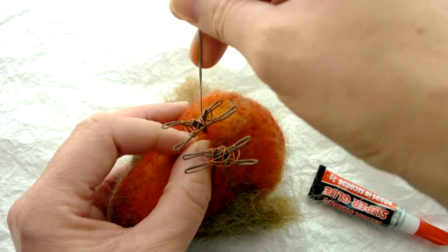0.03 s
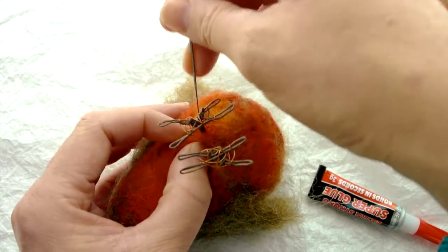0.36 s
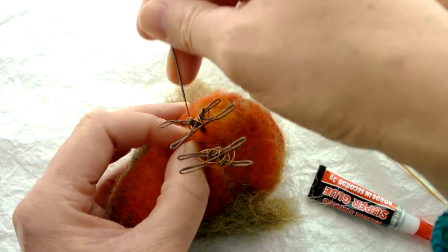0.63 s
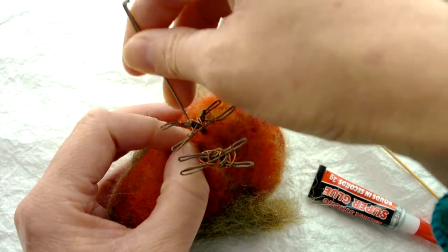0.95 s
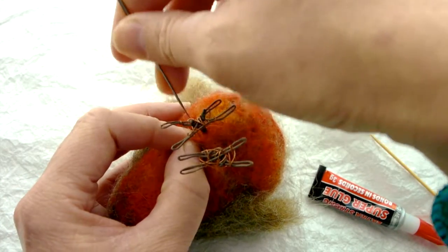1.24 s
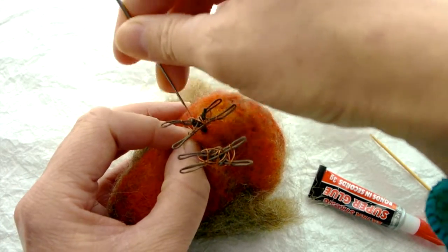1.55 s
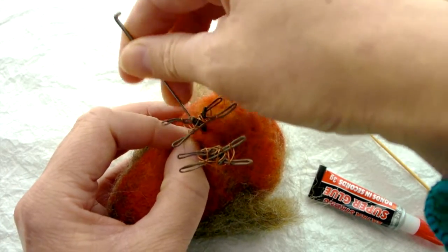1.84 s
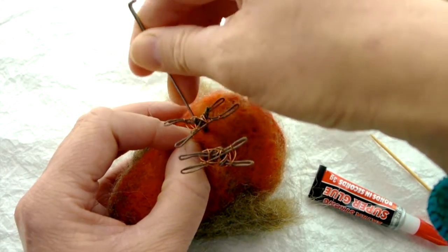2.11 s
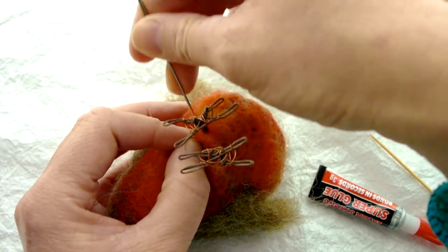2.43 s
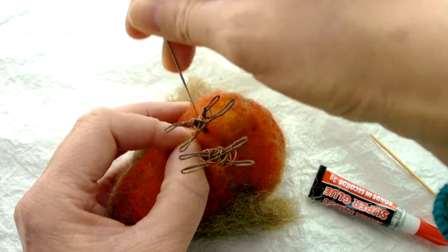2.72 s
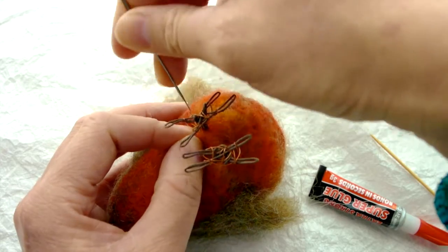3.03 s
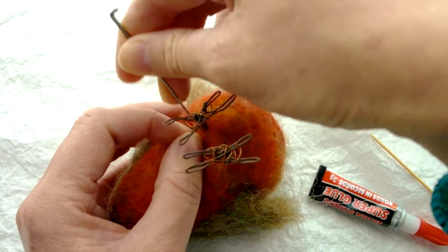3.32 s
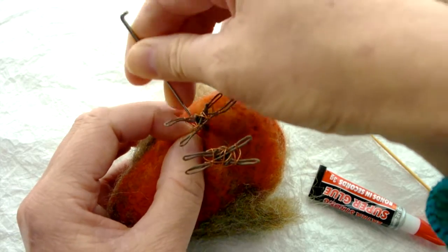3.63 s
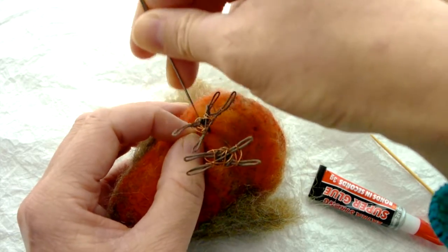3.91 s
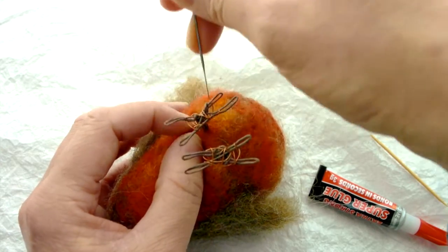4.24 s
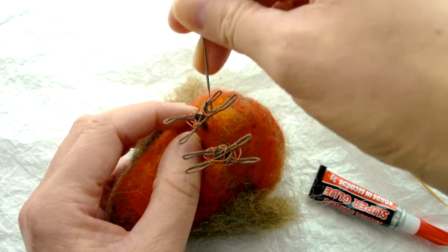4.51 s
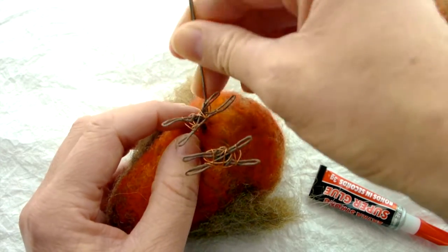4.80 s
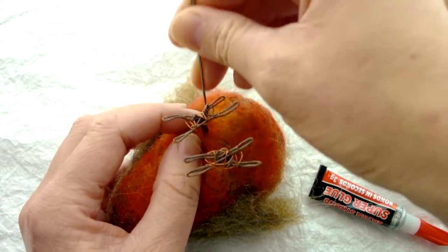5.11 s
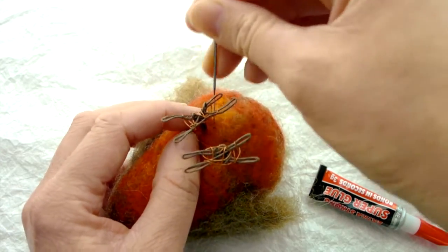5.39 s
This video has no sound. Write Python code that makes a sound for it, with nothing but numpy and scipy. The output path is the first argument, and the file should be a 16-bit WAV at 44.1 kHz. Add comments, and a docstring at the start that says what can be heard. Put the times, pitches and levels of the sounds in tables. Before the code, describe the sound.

A barbed felting needle jabs a ball of wool on a table about six times a second, heard close up in a room. Each jab is a dull little crunch with a faint rasp and a soft thud. Some land harder, with tufts snagging and stiff fibres snapping. The needle ticks lightly against wire and squeaks once near the end. A distant motor hums behind it, fading early, under faint room noise.

```python
"""At a table in a room, close up, a barbed felting needle jabs a ball of wool about six times a second.
Stick-slip friction drives damped resonances: each jab is a dull crunch in the wool, a faint rasp on the
barbs and a soft thud in the table, at times with a rub as the needle is drawn out. Tufts snag, stiff
fibres snap, the needle grazes a wire, and once the shaft squeaks. Behind it a distant motor hums and
the room noise swells and sinks."""
import sys
import numpy as np
from scipy import signal
from scipy.fft import rfft, irfft, next_fast_len
from scipy.io import wavfile

SR = 44100
rng = np.random.default_rng(int(sys.argv[2]) if len(sys.argv) > 2 else 0)


def transcribe(u):
    """Save the signal u as a 16-bit wav file named by the first command-line argument.

    u: samples, shape (n,) or (channels, n), limited to [-1, 1]; the rate is SR.
    q: integer samples, one column per channel.
    """
    v = np.clip(np.atleast_2d(u).T, -1, 1)
    q = np.round(v * 32767).astype(np.int16)
    wavfile.write(sys.argv[1], SR, q)


N = 244916
T = np.arange(N) / SR
SIDES = np.array([[1], [-1]])   # left, right


def from_db(db):
    """Decibels to amplitude ratio."""
    return 10 ** (np.asarray(db) / 20)


def unit_rms(x):
    """Normalisation to rms 1."""
    return x / np.sqrt(np.mean(x ** 2) + 1e-20)


def at_hz(points, hz):
    """Interpolation on a log-frequency axis."""
    freqs, values = np.transpose(points)
    return np.interp(np.log(hz + 1e-9), np.log(freqs), values)


def pan(db):
    """Interchannel level difference as left and right gains."""
    return from_db(SIDES * db / 2)


def drift(rate_hz):
    """Low-passed Gaussian noise: a random wander of spread 1."""
    hz = np.fft.rfftfreq(8192, 1 / 1000)
    slow = irfft(rfft(rng.standard_normal(8192)) / (1 + (hz / rate_hz) ** 2))
    slow = np.interp(T, np.arange(len(slow)) / 1000, slow)
    return unit_rms(slow - slow.mean())


def mode(hz, width_hz, db, phase=0, lag_s=0):
    """Impulse response of a damped resonator: the wider the band, the faster the decay."""
    t = np.maximum(T[:SR // 5] - lag_s, 0)
    envelope = from_db(db) * width_hz * np.exp(-np.pi * width_hz * t) * (t > 0)
    return envelope * np.sin(2 * np.pi * hz * t + phase)


def excite(force, ring):
    """Linear response: the force convolved with the impulse response."""
    return signal.oaconvolve(np.atleast_2d(force), ring, axes=1)[:, :N]


def rubbed(force, ring):
    """Sustained excitation of a stereo ring normalised in energy."""
    return excite(force, ring / np.sqrt(np.sum(ring ** 2) / 2))


def struck(events, ring):
    """Impulsive excitation at each (time [s], peak level [dB])."""
    clicks = np.zeros(N)
    for s, db in events:
        clicks[round(s * SR)] += from_db(db)
    return excite(clicks, ring / np.abs(ring).max())


def cushioned(ring, edge_hz):
    """A compliant contact acts as a low-pass filter."""
    return signal.sosfilt(signal.butter(2, edge_hz, fs=SR, output="sos"), ring)


def slips(per_s, spread_db):
    """Fibre slips as a Poisson train of uneven impulses; rms 1."""
    sizes = from_db(spread_db * np.minimum(rng.exponential(1, N), 3)) * rng.choice([-1, 1], N)
    return unit_rms(sizes * (rng.random(N) < per_s / SR))


def pressure(strokes, edge_s, lag_s=0):
    """Envelope of strokes (time [s], duration [s], level [dB]); incoherent sources add in power."""
    power = np.zeros(N)
    for start, length, db in strokes:
        near = slice(max(round((start - .1) * SR), 0), round((start + length + .1) * SR))
        t = T[near] - start - lag_s
        rise = (1 + np.tanh(t / edge_s)) / 2
        fall = (1 + np.tanh((length - t) / edge_s)) / 2
        power[near] += from_db(db) ** 2 * rise * fall
    return np.sqrt(power)


# motor harmonics: (time [s], relative level of fundamental [dB], relative level of octave [dB])
HUM_LEVELS = [(0.0, -40.5, -46.5), (0.74, -40, -41), (2.21, -56.5, -58.5), (2.94, -52, -57),
              (3.55, -62, -68), (4.08, -46, -49), (4.14, -64, -57.5), (5.35, -56, -49), (5.55, -60, -57)]
def motor_hum(hz=97.1):
    """Amplitude and frequency modulation: two harmonics of a distant motor waver at random."""
    times, *levels = np.transpose(HUM_LEVELS)
    fundamental_db, octave_db = (np.interp(T, times, db) for db in levels)
    phase = 2 * np.pi * np.cumsum(hz * (1 + 0.0077 * drift(2.6))) / SR
    wobble = .55 * drift(6)
    fundamental = from_db(fundamental_db - 1 + 2 * drift(25)) * np.sin(phase)
    octave = from_db(octave_db - 1.5 + 2.33 * drift(14)) * np.sin(2 * phase + wobble)
    return pan(1) * np.sqrt(2) * (fundamental + octave)


# likeness of left and right in the room: (frequency [Hz], coherence [0-1])
COHERENCE = [(25, 0.64), (130, 0.56), (250, 0.9), (500, 0.4), (1000, 0.41), (2000, 0.13), (3500, 0),
             (13000, 0)]
def diffuse_noise(spectrum):
    """A diffuse field is partly coherent in the bass and incoherent in the treble; rms 1."""
    size = 2 * next_fast_len(N // 2 + 1)
    hz = np.fft.rfftfreq(size, 1 / SR)
    mid, side = rfft(rng.standard_normal((2, size))) * from_db(at_hz(spectrum, hz))
    coherence = at_hz(COHERENCE, hz)
    stereo = np.sqrt(1 + coherence) * mid + np.sqrt(1 - coherence) * side * SIDES
    return unit_rms(irfft(stereo)[:, :N])


# three bands of room noise: (frequency [Hz], relative spectral density [dB])
HISS_SPECTRUM = [(1500, -68), (1780, -1), (2050, 9), (2400, 5.5), (2900, 6), (3400, -1.5), (3900, 4),
                 (4700, 3), (5080, -0.5), (5600, 2), (7000, 2), (9000, 1), (13500, -1.5)]
AIR_SPECTRUM = [(200, -12), (300, 2.5), (390, 0), (480, 3), (580, -1.5), (760, 0.5), (920, -2),
                (1220, -4.5), (1390, -3.5), (1600, -9), (1750, -23.5), (2500, -26)]
RUMBLE_SPECTRUM = [(12, -5.5), (32, -0.5), (45, -18), (75, -11), (115, -14.5), (150, -10.5), (235, -15.5),
                   (290, -20), (450, -41.5), (900, -78)]
# swell of the room noise: (time [s], relative level [dB])
ROOM_SWELL = [(0.0, -53), (0.48, -56), (1.62, -62), (2.27, -65.5), (2.69, -63), (3.59, -66), (3.8, -60.5),
              (3.96, -58.5), (4.1, -58.5), (4.84, -63), (5.55, -57.5)]
def room_noise(reference_db=-61.5, whine_hz=4779):
    """Common modulation: hiss, a thin whine, air and rumble swell and sink under one envelope."""
    swell_db = np.interp(T, *np.transpose(ROOM_SWELL)) - reference_db
    hiss = pan(0.23) * from_db(-54.5) * diffuse_noise(HISS_SPECTRUM)
    whine = pan(-8) * from_db(-75) * np.sin(2 * np.pi * np.cumsum(whine_hz + 6 * drift(25)) / SR)
    air = pan(0.2) * from_db(-54.5) * diffuse_noise(AIR_SPECTRUM)
    rumble = pan(1.6) * from_db(-44.5) * diffuse_noise(RUMBLE_SPECTRUM)
    return from_db(swell_db) * (hiss + whine + air + rumble)


# steel grazing wire: (time [s], peak level [dB], frequency [Hz], 60 dB decay time [s])
WIRE_GRAZES = [(0.0375, -32, 4120, 0.017), (1.347, -42, 2040, 0.018), (5.411, -47, 6800, 0.045)]
def wire_pings():
    """Free vibration: the needle grazes a wire and rings briefly in a single mode."""
    return sum(struck([(s, db)], mode(hz, np.log(1000) / (np.pi * t60), 0)[None])
               for s, db, hz, t60 in WIRE_GRAZES)


# modes of the ball on the table: (frequency [Hz], bandwidth [Hz], relative level [dB])
WOOL_MODES = [(313, 69, 1.5), (460, 140, -5), (731, 75, 3.5), (815, 81, 0.5), (1060, 79, -9),
              (1372, 45, -4), (1500, 70, -10), (2270, 260, -15.5)]
# its radiation to the two sides: (frequency [Hz], level of left over right [dB])
WOOL_PAN = [(500, .3), (800, 1), (1060, -1), (1380, 9), (1550, 2), (2250, 2)]
# and their phase difference: (frequency [Hz], lead of left [rad])
WOOL_LEAD = [(480, .2), (1050, -.1), (1380, -.8), (1600, -.7), (2250, 1.2)]
def wool_ring():
    """Modal superposition: the impulse response of the ball through a soft contact."""
    ring = 0
    for k, (hz, width, db) in enumerate(WOOL_MODES):
        phase = SIDES / 2 * at_hz(WOOL_LEAD, hz)
        ring += (-1) ** k * pan(at_hz(WOOL_PAN, hz)) * mode(hz, width, db, phase)
    return cushioned(ring, edge_hz=2700)


# inward strokes: (time [s], duration [s], relative crunch level [dB], relative rasp level [dB])
NEEDLE_JABS = [(0.089, 0.054, -39.5, -51.5), (0.295, 0.024, -48, -52.5), (0.442, 0.05, -41.5, -50.5),
               (0.587, 0.091, -53.5, -57), (0.775, .028, -55, -52), (.939, 0.053, -47.5, -56),
               (1.105, 0.027, -41.5, -50), (1.274, 0.069, -44, -54.5), (1.433, 0.044, -44, -55),
               (1.597, 0.055, -41.5, -55.5), (1.773, 0.061, -46, -61.5), (1.967, 0.0187, -45, -53),
               (2.102, 0.042, -46, -56.5), (2.268, 0.053, -48, -58.5), (2.437, 0.05, -42, -59),
               (2.663, 0.036, -53.5, -67), (2.915, 0.083, -53, -58.5), (3.08, 0.07, -50, -59.5),
               (3.246, 0.068, -51, -62), (3.435, 0.044, -44.5, -59.5), (3.602, 0.034, -48, -61),
               (3.765, .04, -35.5, -57), (3.917, .05, -42.5, -60), (4.121, 0.0063, -62, -52),
               (4.411, .046, -46, -62), (4.564, 0.058, -44.5, -54.5), (4.747, 0.058, -45, -56),
               (4.929, .045, -42, -58), (5.143, .037, -44.5, -53.5), (5.306, 0.043, -45, -55.5),
               (5.457, 0.0545, -37.5, -58.5)]
# fibres dragged on the way out: (time [s], relative level [dB])
NEEDLE_PULLS = [(1.54, -47), (1.697, -49), (2.52, -50), (3.844, -41), (4.205, -47)]
def wool_crunch(ring, pull_s=0.017):
    """Stick-slip friction: runs of fibre slips shake the packed wool as the needle moves."""
    strokes = [(start, length, db) for start, length, db, _ in NEEDLE_JABS]
    strokes += [(s, pull_s, db) for s, db in NEEDLE_PULLS]
    clumping = from_db(2 * drift(60))
    grit = unit_rms(clumping * slips(per_s=1600, spread_db=5.5))
    return from_db(-2) * rubbed(pressure(strokes, edge_s=0.0078) * grit, ring)


# modes of the table: (frequency [Hz], bandwidth [Hz], relative level [dB])
TABLE_MODES = [(42.3, 11, 18.5), (123, 29, 10), (195, 234, 3.5), (312, 19, 7), (480, 29, 0.5),
               (674, 60, -1), (1027, 320, -12)]
# hard pushes, duller through more wool: (time [s], peak level [dB], cutoff [Hz])
HARD_PUSHES = [(0.4566, -14.5, 2000), (0.4876, -25, 900), (2.455, -29.5, 804), (3.775, -31, 700),
               (3.948, -29.5, 500), (4.61, -33, 300), (4.966, -25, 212), (5.165, -27, 219),
               (5.474, -24, 408)]
def table_thuds(lag_at_200_hz_s=0.0033, thud_db=-0.5):
    """Dispersion: each push launches bending waves in the table, and the low ones travel slowest."""
    ring = pan(1) * sum((-1) ** k * mode(hz, width, db, lag_s=lag_at_200_hz_s * np.sqrt(200 / hz))
                        for k, (hz, width, db) in enumerate(TABLE_MODES))
    ring = ring[:, np.argmax(ring[0] != 0):]   # time counts from the first arrival
    pushes = [(start, length, db + thud_db) for start, length, db, _ in NEEDLE_JABS]
    force = pressure(pushes, edge_s=0.0076) * rng.standard_normal(N)
    knocks = sum(struck([(s, db)], cushioned(ring, edge_hz)) for s, db, edge_hz in HARD_PUSHES)
    return rubbed(force, cushioned(ring, edge_hz=163)) + knocks


# modes of the scraped barbs: (frequency [Hz], bandwidth [Hz], relative level [dB])
BARB_MODES = [(2420, 350, -4.5), (4250, 140, 0.5), (4660, 170, 13.5), (5840, 250, 4), (6740, 520, -37),
              (6670, 900, 3), (8650, 13600, 4), (10700, 2300, -10.5)]
# stiff fibres snapping on the steel: (time [s], relative level [dB])
FIBRE_SNAPS = [(.4563, -34), (1.3024, -33.5), (2.472, -36), (3.7928, -25), (4.4358, -36), (5.164, -29.5)]
def needle_barbs():
    """Forced vibration: fibres rasp and snap on the barbs, whose modes reach the sides in quadrature."""
    ring = pan(2.5) * sum(mode(hz, width, db, phase=(-1) ** k * SIDES * np.pi / 4)
                          for k, (hz, width, db) in enumerate(BARB_MODES))
    grit = slips(per_s=4000, spread_db=4)
    strokes = [(start, length, db) for start, length, _, db in NEEDLE_JABS]
    rasp = rubbed(pressure(strokes, edge_s=0.0039, lag_s=0.0022) * grit, ring)
    # a snap is followed by its reflections off hands and table
    scatter = rng.standard_normal((2, SR // 20)) * np.exp(-T[:SR // 20] / .006)
    snap = ring + from_db(-19.5) * excite(scatter, ring)[:, :ring.shape[1]]
    return from_db(0.2) * rasp + from_db(7) * struck(FIBRE_SNAPS, snap)


def small_tufts(above_jab_db=6.5, spread_db=3):
    """Uniform chance: each jab catches one tuft on its way, as (time [s], relative level [dB])."""
    draws = rng.random((len(NEEDLE_JABS), 2))
    return [(start + where * length, db + above_jab_db + spread_db * (2 * size - 1))
            for (start, length, db, _), (where, size) in zip(NEEDLE_JABS, draws)]


# tufts caught on a barb: (time [s], relative level [dB])
CAUGHT_TUFTS = [(0.787, -39.5), (1.114, -37), (1.251, -34), (1.304, -30), (1.432, -31), (1.756, -40),
                (1.874, -40), (1.92, -36), (1.976, -38.5), (2.089, -33), (2.937, -32.5), (2.982, -35.5),
                (3.118, -34.5), (3.277, -36.5), (3.604, -32), (3.776, -29), (3.793, -24.5), (3.94, -26),
                (4.109, -32.5), (4.947, -34), (5.341, -30), (5.452, -35), (5.474, -26.5)]
def snags(ring, extra_tufts, decay_s=0.007, run_db=-0.5):
    """Sudden release of tension: a tuft gives way with one break and a decaying run of slips."""
    out, t = np.zeros((2, N)), T[:SR // 40]
    for s, db in list(CAUGHT_TUFTS) + extra_tufts:
        at = round(s * SR)
        run = rng.standard_normal(len(t)) * np.exp(-t / decay_s)
        force = (t == 0) + from_db(run_db) * run / np.linalg.norm(run)
        tear = excite(force, ring)[:, :N - at]
        out[:, at:at + tear.shape[1]] += from_db(db) * tear / np.abs(tear).max()
    return from_db(1.5) * out


# the shaft in tight wool: (time [s], duration [s], frequency [Hz], level [dB])
SHAFT_SQUEAK = (5.298, .029, 780, -39.5)
def shaft_squeak():
    """Periodic stick-slip: a brief tone that grows and breaks off."""
    start, length, hz, db = SHAFT_SQUEAK
    along = np.clip((T - start) / length, 0, 1)
    envelope = np.sqrt(np.abs(np.sin(np.pi * along ** 1.8)))
    phase = 2 * np.pi * np.cumsum(hz * (1 + 0.056 * drift(77))) / SR
    return from_db(db) * envelope * np.sqrt(2) * np.sin(phase)


def scene():
    """Superposition: the felting adds to the motor and the room noise."""
    ring, tufts = wool_ring(), small_tufts()
    wool = wool_crunch(ring) + snags(ring, tufts)
    needle = shaft_squeak() + needle_barbs() + wire_pings()
    return wool + needle + table_thuds() + motor_hum() + room_noise()


def record(dry, low_hz=22, high_hz=13750):
    """Band limiting: the microphone loses the deepest bass, and the top is cut steeply."""
    heard = signal.sosfilt(signal.butter(1, low_hz, "high", fs=SR, output="sos"), dry)
    return signal.sosfilt(signal.ellip(12, .1, 80, high_hz, fs=SR, output="sos"), heard)


dry = scene()
out = record(dry)
transcribe(out)
```